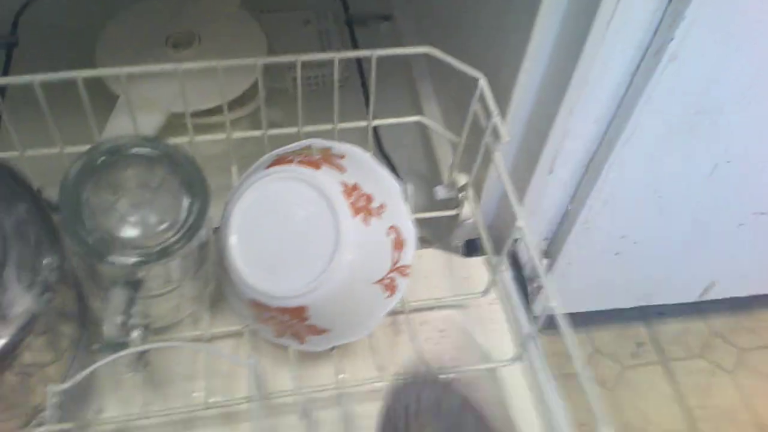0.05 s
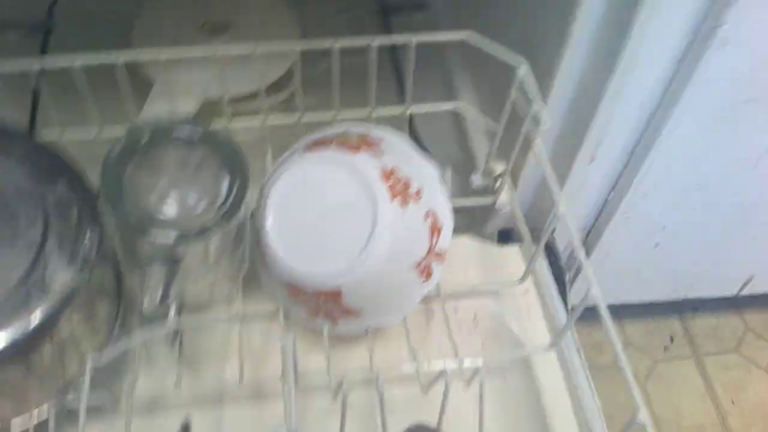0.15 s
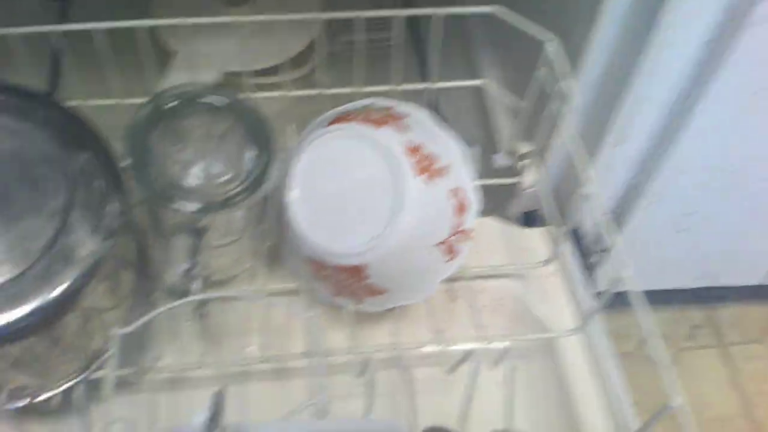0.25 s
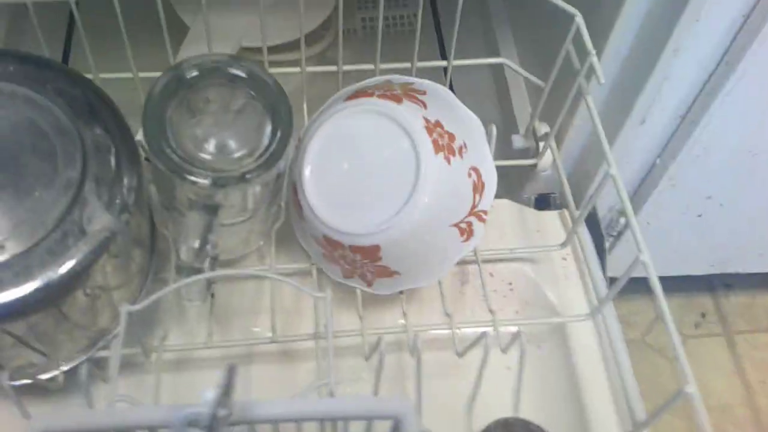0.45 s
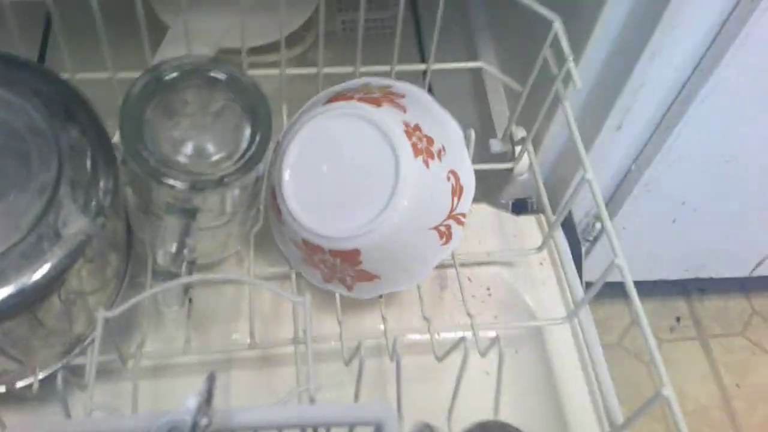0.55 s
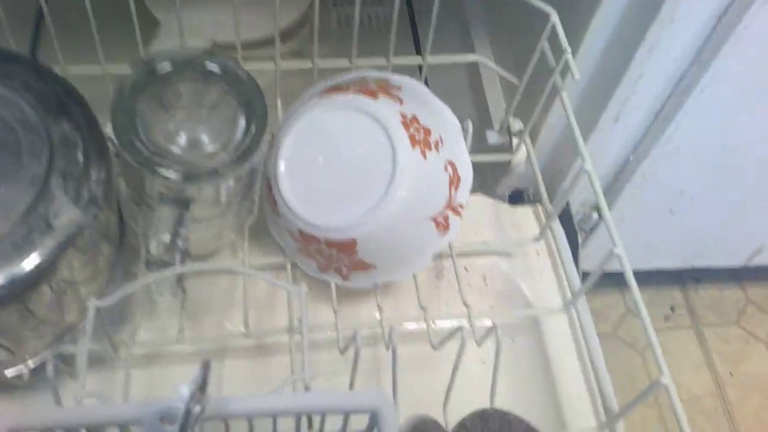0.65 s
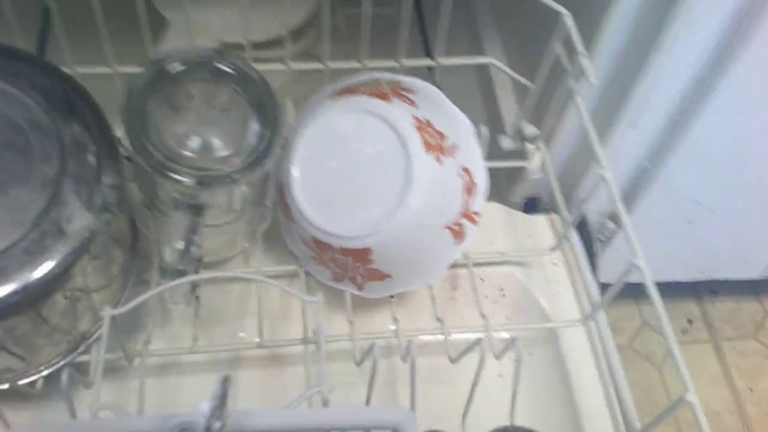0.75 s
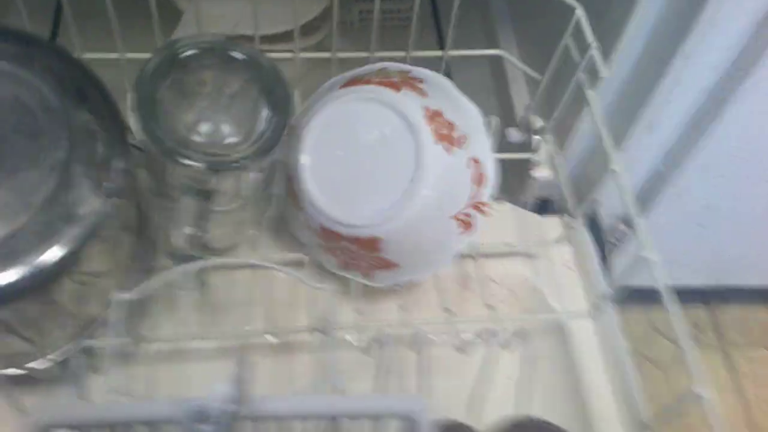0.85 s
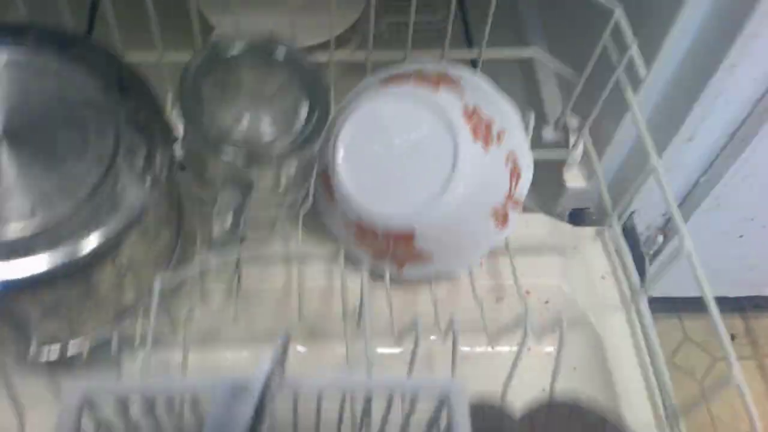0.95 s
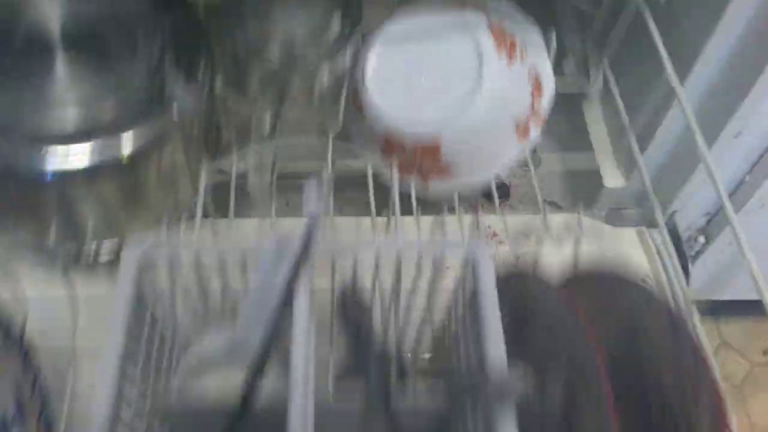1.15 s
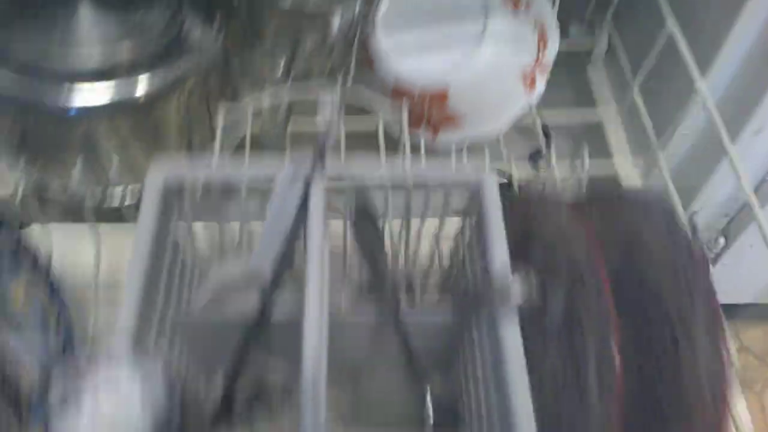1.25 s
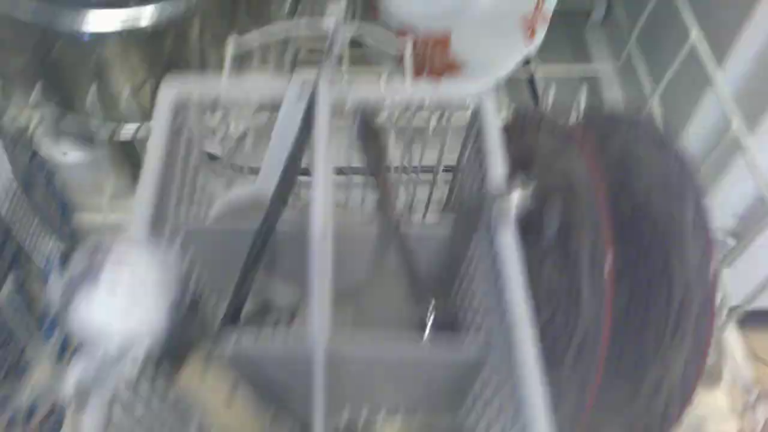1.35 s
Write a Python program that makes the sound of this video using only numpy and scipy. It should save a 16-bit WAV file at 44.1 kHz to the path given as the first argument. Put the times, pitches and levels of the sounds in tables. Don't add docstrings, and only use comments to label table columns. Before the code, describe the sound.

Cutlery clatters as a plastic basket knocks twice against a dishwasher rack in a small kitchen

```python
import sys
import numpy as np
from scipy import signal
from scipy.fft import rfft, irfft
from scipy.io import wavfile
from scipy.ndimage import uniform_filter1d

SR = 44100
rng = np.random.default_rng(int(sys.argv[2]) if len(sys.argv) > 2 else 0)


def voltage_ratio(decibels):
    exponent = np.asarray(decibels, float) / 20
    return 10 ** exponent


def int16_out(signal):
    q = np.round(np.clip(np.atleast_2d(signal).T, -1, 1) * 32767)
    wavfile.write(sys.argv[1], SR, q.astype(np.int16))


N = 61739


def level_at(table, seconds):
    times, db = np.transpose(table)
    return np.interp(seconds, times, db, -120, -120)


def spectrum_at(table, hz):
    corners, db = np.transpose(table)
    return np.interp(np.log(hz), np.log(corners), db)


def unit(x):
    return x / np.sqrt(np.mean(x ** 2))


def walk(rate_hz):
    width = int(SR / rate_hz)
    smooth = uniform_filter1d(rng.standard_normal(N), width)
    return unit(uniform_filter1d(smooth, width))


def decay(t, t60_s):
    return np.exp(-np.log(1000) * t / t60_s)


def lowpass(x, hz):
    return signal.sosfilt(signal.butter(1, hz, fs=SR, output="sos"), x)


def bandpass(x, edges_hz, order):
    return signal.sosfilt(signal.butter(order, edges_hz, "band", fs=SR, output="sos"), x)


def cut_lows(x):
    return signal.sosfilt(signal.butter(4, 65, "high", fs=SR, output="sos"), x)


# pitch_hz [Hz], level_db [dB]
ROOM_NOISE = [(15, -73), (25, -28), (223, 2), (330, 1.5), (567, -11.5), (1340, -17.5), (4810, -38.5),
              (6960, -32), (8900, -46.5), (11600, -96.5), (19600, -120)]
# pitch_hz [Hz], level_db [dB rms]
FRIDGE_LINES = [(119.5, -54.5), (1310, -78)]


def kitchen():
    hz = np.arange(N // 2 + 1) * SR / N + 1
    spectrum = rfft(rng.standard_normal(N)) * voltage_ratio(spectrum_at(ROOM_NOISE, hz))
    noise = np.zeros(N)
    for band in range(-12, 8):
        weight = np.clip(1 - abs(2 * np.log2(hz / 1000) - band), 0, 1)
        noise += irfft(spectrum * weight, N) * voltage_ratio(3.1 * walk(24))
    t = np.arange(N) / SR
    hum = np.zeros(N)
    for pitch_hz, level_db in FRIDGE_LINES:
        hum += voltage_ratio(level_db + 2.5 + walk(22)) * np.sin(2 * np.pi * pitch_hz * t)
    return unit(noise) * voltage_ratio(-44.5) + hum


def echo(near):
    t = np.arange(SR // 2) / SR
    response = rng.standard_normal(len(t)) * decay(t, 0.28) * (t > .003)
    response = lowpass(response, 3500)
    response /= np.sqrt(np.sum(response ** 2))
    return voltage_ratio(-12.5) * signal.fftconvolve(near, response)[:N]


def mode(force, pitch_hz, t60_s):
    pole = np.exp(2j * np.pi * pitch_hz / SR - np.log(1000) / (max(t60_s, .003) * SR))
    return signal.lfilter([1], [1, -pole], force).imag


# start_s [s], thud_db [dB], contact_ms [ms], shake_s [s], clack_db [dB]
KNOCKS = [(0.226, -26, 0.25, 0.056, -32.5), (0.252, -22.5, 0.31, 0.027, -29.5),
          (.446, -13, 0.41, 0.046, -18), (0.464, -15.5, .4, 0.032, -25), (0.494, -10, .72, 0.078, -23.5),
          (0.539, -17, 0.37, 0.056, -30), (0.59, -25.5, 0.39, 0.097, -45), (.813, -46, 0.52, 0.033, -36),
          (0.966, -39.5, 0.19, 0.037, -36), (1.083, -29.5, 0.54, 0.065, -43.5),
          (1.2, -30, 0.72, 0.21, -52.5)]
# start_s [s], level_db [dB]
HANDLING = [(0, -56), (.2, -71), (.44, -72), (.55, -54), (.68, -46), (.93, -64), (1.06, -45), (1.12, -46),
            (1.4, -45)]
# pitch_hz [Hz], level_db [dB], t60_s [s]
BASKET_MODES = [(83.4, -22, .15), (209.4, -6.5, 0.072), (224.6, -12, 0.2), (294.3, -1.5, 0.06),
                (356, 0, .13), (411, -3, .1), (530, 0.5, 0.027), (648.6, -2.5, 0.11), (736, -1, 0.11),
                (805.5, 2.5, 0.047), (934, -0.5, 0.054), (1040, -7, 0.059), (1535, -12, .07)]


def basket():
    force, clack = np.zeros(N + SR), np.zeros(N + SR)
    t = np.arange(SR // 4) / SR
    for start_s, thud_db, contact_ms, shake_s, clack_db in KNOCKS:
        fades = np.array([voltage_ratio(-20 * t / shake_s), voltage_ratio(-10 * (t / shake_s) ** 2)])
        shake, plastic = rng.standard_normal((2, len(t))) * fades * (1 - np.exp(-t / 0.0017))
        contact = t * np.exp(-t * 1000 / max(contact_ms, .05))
        blow = (t == 0) + voltage_ratio(-27) * shake
        i = int(start_s * SR)
        force[i:i + len(t)] += voltage_ratio(thud_db) * signal.fftconvolve(blow, contact / contact.sum())[:len(t)]
        clack[i:i + len(t)] += voltage_ratio(clack_db) * plastic

    rubbing = rng.standard_normal(N)
    effort_db = level_at(HANDLING, np.arange(N) / SR) - 27 + 2.1 * walk(29)
    drive = force[:N] + lowpass(rubbing * voltage_ratio(effort_db), 450)
    body = np.zeros(N)
    for k, (pitch_hz, level_db, t60_s) in enumerate(BASKET_MODES):
        body += (-1) ** k * voltage_ratio(level_db) * mode(drive, pitch_hz, t60_s)

    clack = lowpass(clack[:N] * voltage_ratio(8.5 + 1.7 * walk(140)), 980)
    return body + bandpass(clack, [574, 3500], 4)


# start_s [s], level_db [dB]
RATTLE = [(.1945, -16.5), (.220, -35), (.224, -24.5), (.26, -33.5), (.33, -73), (.4455, -75), (.4465, -15),
          (.47, -12), (.56, -23), (.64, -31.5), (.75, -56)]
# pitch_hz [Hz], level_db [dB]
RATTLE_COLOUR = [(900, -3), (1400, -15.5), (2200, 1), (3500, -8.5), (4400, -11.5), (7000, -8.5),
                 (9000, -20.5)]


def rattle():
    wait, place, strength, damping = rng.random((2100, 4)).T
    starts = RATTLE[0][0] + np.cumsum(-np.log(1 - wait)) / 3600
    pitches = 1100 * 7.5 ** place
    levels = level_at(RATTLE, starts) + spectrum_at(RATTLE_COLOUR, pitches) - 14
    levels += 10 * np.log10(pitches / 2000)
    levels -= 1.5 * np.log(1 - strength)
    t60s = .035 * (.5 + damping)
    out, t = np.zeros(N + SR), np.arange(SR // 20) / SR
    for start_s, pitch_hz, gain, t60_s in zip(starts, pitches, voltage_ratio(levels), t60s):
        i = int(start_s * SR)
        out[i:i + len(t)] += gain * np.sin(2 * np.pi * pitch_hz * t) * decay(t, t60_s)
    return out[:N]


def strike(blows, modes):
    out, t = np.zeros(N + SR), np.arange(SR // 7) / SR
    pitch_hz, mode_db, t60_s = np.array(modes).T[:, :, None]
    for start_s, level_db, bright_hz, spread_oct, free_s in blows:
        spread_oct = max(spread_oct, .03)
        scatter_db, phase = rng.standard_normal((2, len(modes), 1))
        nearness = np.exp(-.5 * (np.log2(pitch_hz / bright_hz) / spread_oct) ** 2)
        gain = nearness * voltage_ratio(mode_db + scatter_db)
        damped_s = np.maximum(t - free_s, 0)
        fade = voltage_ratio(-60 * t / t60_s - 60 * damped_s / 0.0076)
        tone = np.sum(gain * fade * np.sin(2 * np.pi * (pitch_hz * t + phase)), axis=0)
        tone /= np.sqrt(np.sum(gain ** 2))

        edges_hz = np.clip(bright_hz * 2. ** (spread_oct * np.array([-1, 1])), 150, SR / 4)
        crack = bandpass(rng.standard_normal(len(t)) * np.exp(-t / 0.01), edges_hz, 3)
        crack *= voltage_ratio(-1) * min(spread_oct, 1) / abs(crack).max()
        i = int(start_s * SR)
        out[i:i + len(t)] += voltage_ratio(level_db) * (tone + crack) * (1 - np.exp(-t / .0006))
    return out[:N] * voltage_ratio(2.5 * walk(170))


# start_s [s], level_db [dB], bright_hz [Hz], spread_oct [octaves], free_s [s until damped]
THUMPS = [(.1945, -26, 1090, 0.35, 0.0028), (.246, -20.5, 720, 0.32, 0.02),
          (.256, -25.5, 480, 0.32, 0.0055), (.277, -29.5, 750, 0.19, 0.011), (.4475, -13, 370, 0.17, 0.013),
          (.461, -18.5, 380, 0.15, 0.0055), (.4685, -8, 750, 0.67, 0.0037), (.472, -13.5, 373, 0.12, 0.012),
          (.487, -11.5, 364, 0.16, .009), (.549, -21, 388, 0.11, 0.029), (.576, -23, 360, 0.26, 0.0063),
          (.595, -32.5, 500, .5, 0.0063), (.813, -41, 1020, .1, .01), (.836, -31, 345, .1, .016),
          (.864, -37, 350, .15, .015), (.972, -36, 900, .25, .022), (1.089, -38, 960, .15, .012),
          (1.114, -34, 390, .2, .012), (1.221, -34.5, 420, .25, 0.01), (1.268, -29.5, 300, 0.23, .012),
          (1.303, -36, 302, 0.31, 0.03), (1.392, -32, 476, 0.43, 0.014)]


def thumps():
    return cut_lows(strike(THUMPS, BASKET_MODES))


# start_s [s], level_db [dB], bright_hz [Hz], spread_oct [octaves], free_s [s until damped]
TAPS = [(.632, -23.5, 4500, 0.88, 0.015), (.634, -23, 3605, 0.057, 0.015), (.636, -24, 2230, .05, 0.011),
        (.643, -48, 5290, 0.081, 0.028), (.670, -40.5, 2800, .77, 0.022), (.7155, -39, 7900, .11, 0.00073),
        (.7562, -28, 5300, 0.6, 0.013), (.7575, -27.5, 2800, 0.77, 0.022), (.776, -39, 3600, .05, .012),
        (.861, -35, 3300, .35, .025), (.8615, -40, 5290, .03, .011), (.8625, -39, 2272, .05, .055),
        (.949, -32, 2200, .12, .012), (.9495, -40, 3800, .2, .01), (.950, -46, 5820, .03, .03),
        (1.088, -41, 1900, .4, .004), (1.2235, -50.5, 7450, 0.19, 0.0032), (1.252, -62, 6760, .05, 0.024)]
# pitch_hz [Hz], level_db [dB], t60_s [s]
BOWL_MODES = [(1840, -13, .1), (1980, -14, .05), (2272, 0, .14), (2760, -7, .07), (2955, -8, .03),
              (3605, -5, .06), (3950, -10, .05), (4355, -9, .045), (5090, -10, .06), (5290, -6, .05),
              (5560, -11, .1), (5830, -11, .08), (6640, -11, .1), (7270, -10, .06)]


def bowl():
    return strike(TAPS, BOWL_MODES)


# start_s [s], level_db [dB], bright_hz [Hz], spread_oct [octaves], free_s [s until damped]
DROP = [
    (.1943, -23, 2230, 0.65, 0.0062),
    (.199, -43, 1630, 0.043, 0.027),
    (.205, -31.5, 3900, 0.099, 0.017),
    (.4605, -25.5, 8800, 0.52, 0.025),
    (0.24, -30, 5200, .03, 0.01),
]
# pitch_hz [Hz], level_db [dB], t60_s [s]
FORK_MODES = [(1630, 0, .08), (2200, -3, .025), (3040, -6, .1), (3810, -5, .12), (4170, -1, .05),
              (5210, -9, .05), (5680, -11, .05), (6300, -12, .025), (7350, -4, .04), (8500, -12, .04)]


def fork():
    return strike(DROP, FORK_MODES)


# start_s [s], level_db [dB], bright_hz [Hz], spread_oct [octaves], free_s [s until damped]
CLINKS = [
    (.2225, -21, 1700, .6, .009),
    (.2245, -17, 2900, .25, .008),
    (.226, -37, 6000, .2, .012),
    (.2405, -36, 7200, .25, .004),
    (.2415, -28, 3600, .15, .011),
    (.248, -28, 2250, .05, .022),
    (.269, -35, 3600, .1, .018),
    (.278, -39, 2250, .05, .04),
    (.3965, -46, 3000, .5, .06),
    (.446, -19, 3500, 1.2, .02),
]
# pitch_hz [Hz], level_db [dB], t60_s [s]
SPOON_MODES = [(1270, -3, .06), (2240, -2, .2), (2920, 0, .2), (3300, -8, .08), (3560, -3, .2),
               (3800, -5, .08), (4170, -10, .12), (5670, -8, .08), (6590, -13, .06), (7180, -14, .06)]


def spoons():
    return strike(CLINKS, SPOON_MODES)


# start_s [s], level_db [dB], bright_hz [Hz], spread_oct [octaves], free_s [s until damped]
CRASH = [(.449, -20.5, 2150, 0.17, 0.0027), (.448, -24.5, 3500, .1, 0.022),
         (.4615, -14.5, 2000, 0.18, 0.0093), (.4625, -15.5, 3500, .3, 0.0071),
         (.4665, -13, 2350, 0.057, 0.0028), (.467, -13, 3750, 0.034, 0.0015),
         (.4685, -14, 2100, 1.25, 0.0044), (.476, -21, 7100, 0.086, 0.11), (.481, -21, 2170, 0.11, 0.0092),
         (.495, -14, 3370, .1, 0.01), (.496, -16.5, 2023, 0.24, 0.013), (.509, -21.5, 3530, 0.074, .008),
         (.521, -25.5, 2220, 0.062, 0.035), (.548, -26.5, 4500, 1, 0.0027),
         (.570, -15.5, 3435, 0.034, 0.012), (.570, -32, 4656, .05, 0.027), (.572, -24, 1950, 0.2, 0.014),
         (.573, -28, 7220, 0.25, 0.01), (.582, -24, 3400, .05, 0.008), (.593, -35.5, 7000, .08, 0.072),
         (.613, -32, 2242, .05, 0.051), (.728, -47, 1940, 0.12, 0.045)]
# pitch_hz [Hz], level_db [dB], t60_s [s]
KNIFE_MODES = [(1460, -16, .08), (1870, -4, 0.83), (1940, -5, 0.87), (2730, -14.5, .12), (2242, 0, .25),
               (2270, -5, .2), (3375, -3, .13), (3577, -4, .18), (6990, -8, .15), (4656, -5.5, 0.12),
               (5560, 5.5, 0.057), (5040, -5, .08), (6300, -18.5, 0.069), (7450, -20, .1)]


def knives():
    return strike(CRASH, KNIFE_MODES)


def scene():
    near = cut_lows(basket())
    near = near + fork() + spoons() + knives() + bowl()
    near = near + thumps() + rattle()
    return (near + echo(near) + kitchen())[None]


def band_limit(x):
    return signal.sosfilt(signal.butter(12, 9050, fs=SR, output="sos"), x)


def record(dry):
    top_cut = signal.cheby1(10, 1.5, 8475, fs=SR, output="sos")
    mix = signal.sosfilt(top_cut, dry)
    return band_limit(mix)


dry = scene()
out = record(dry)
int16_out(out)
```